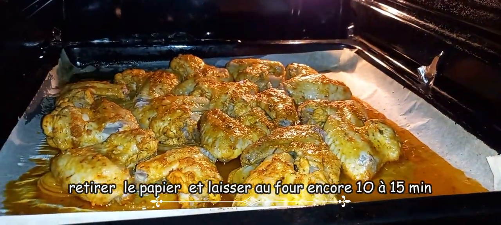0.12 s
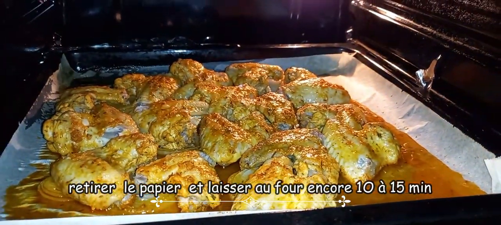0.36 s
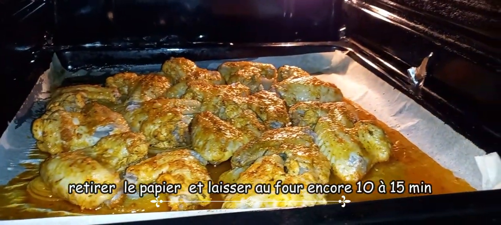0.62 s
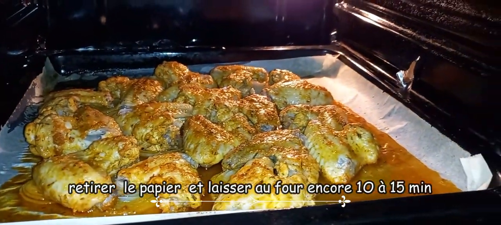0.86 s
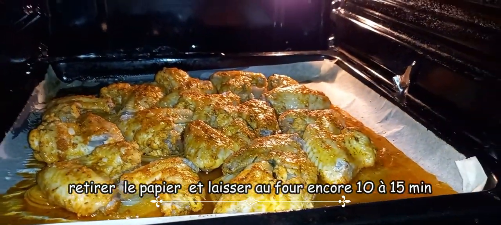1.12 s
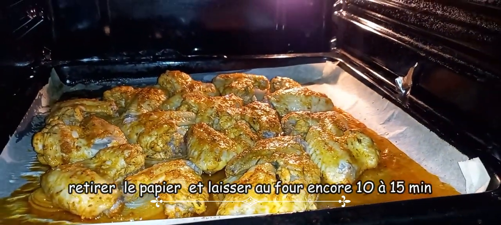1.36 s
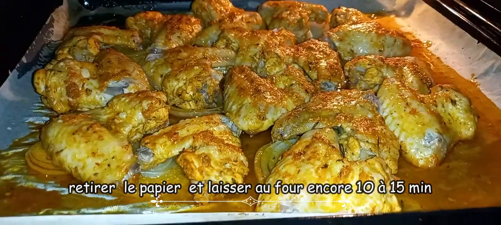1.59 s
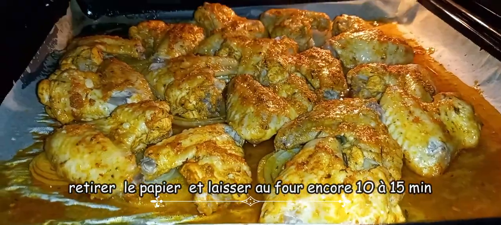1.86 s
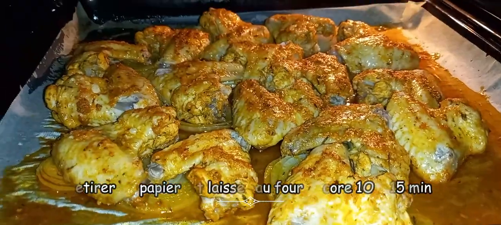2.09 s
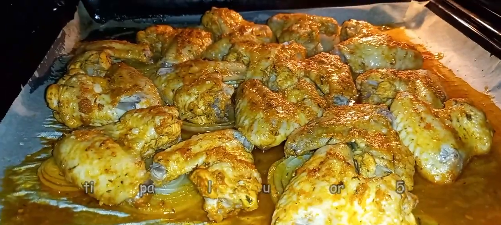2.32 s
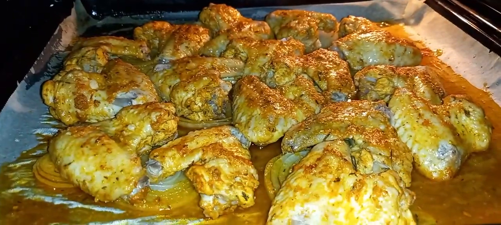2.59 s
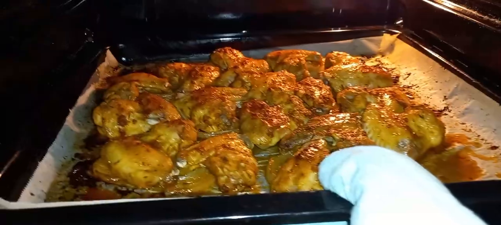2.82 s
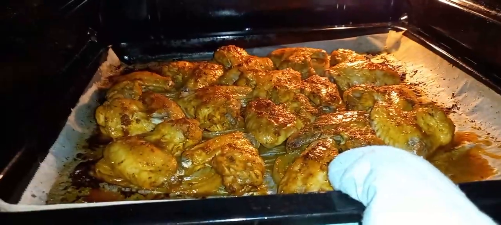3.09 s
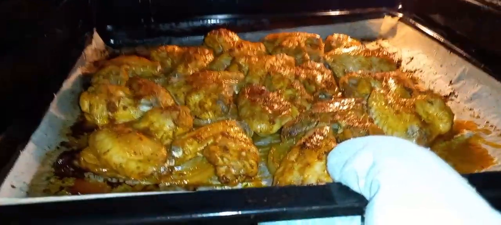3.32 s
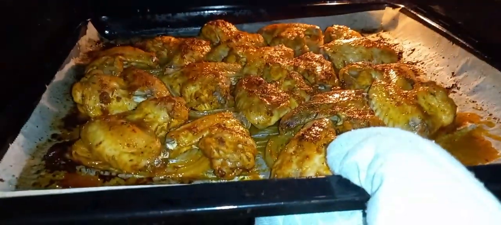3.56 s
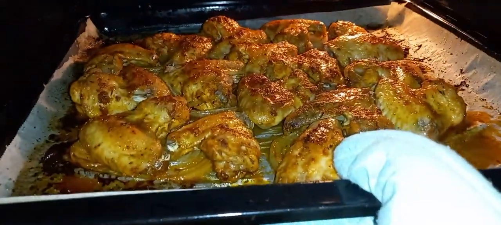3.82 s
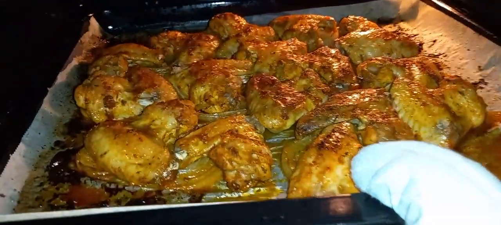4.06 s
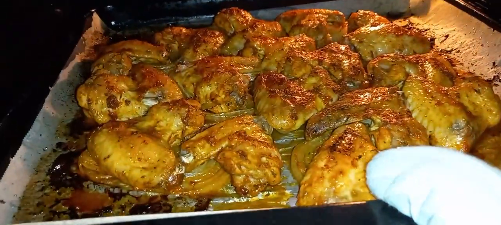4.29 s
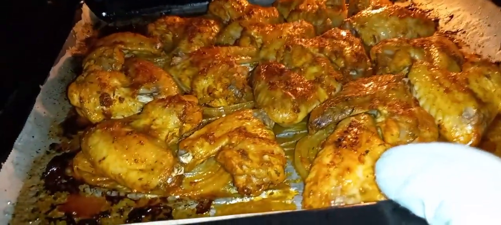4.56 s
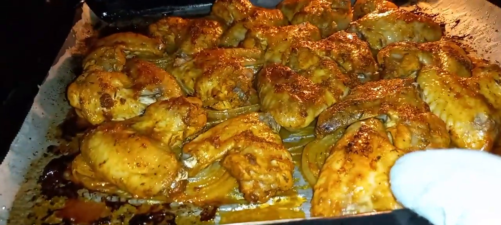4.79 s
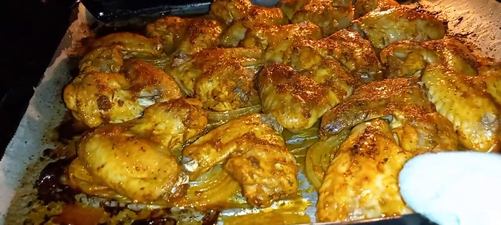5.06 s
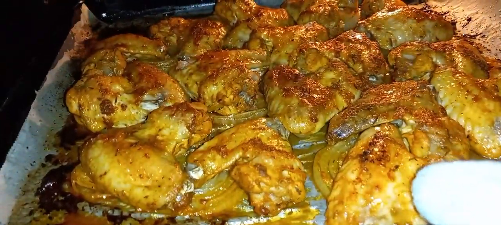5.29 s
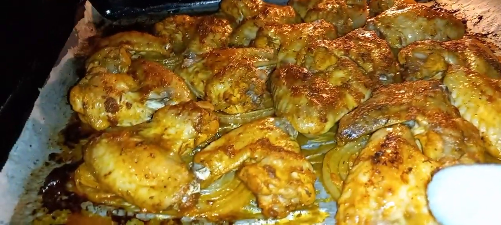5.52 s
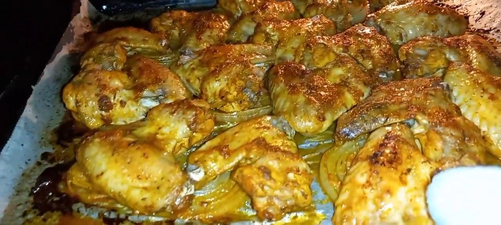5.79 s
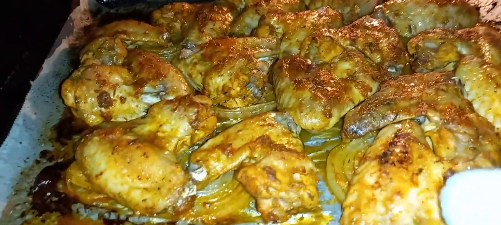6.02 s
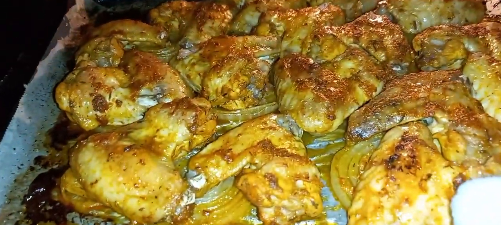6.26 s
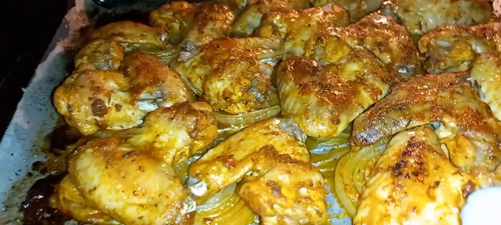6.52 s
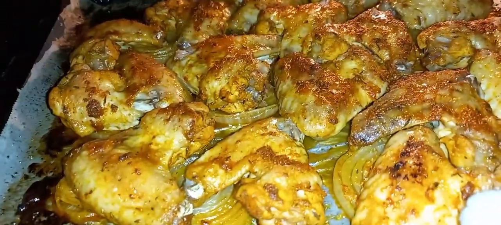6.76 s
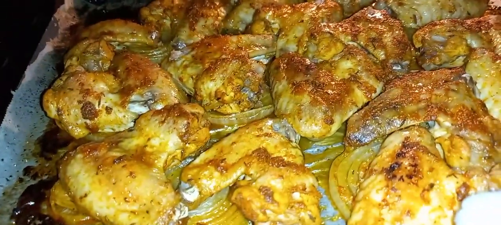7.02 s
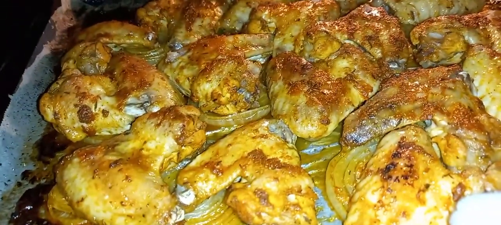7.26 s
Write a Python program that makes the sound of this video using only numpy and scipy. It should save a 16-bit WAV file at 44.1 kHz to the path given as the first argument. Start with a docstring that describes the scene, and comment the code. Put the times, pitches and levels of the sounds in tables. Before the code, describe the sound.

Bright, dry paper crackle opens over a steady low electric hum in a kitchen oven. The paper fades, leaving sparse high ticks of spitting fat. Hard cuts change the airy drone; after a very brief gap comes a heavy hollow tray thump, then a clattering cluster. Small fat pops grow busier, with soft tray bumps and a paper tick at the close, picked up nearby by a phone.

```python
"""Baking paper is pulled away with crinkles and snaps, over the hum and blowing of an open oven, near a phone.
Fat spits on roasting meat; after a short silence the steel tray slides and knocks on its rails, and again near
the end. Three stretches join by hard cuts. Paper, fat and air are shaped noise; the motor is wavering sines;
each knock is a decaying thud, a bank of panel modes and a noise rattle."""
import sys
import numpy as np
from scipy import signal
from scipy.fft import rfft, irfft, next_fast_len
from scipy.io import wavfile
from scipy.ndimage import uniform_filter1d

SR = 44100
rng = np.random.default_rng(int(sys.argv[2]) if len(sys.argv) > 2 else 0)


def generate_wav(signal):
    """Clip the signal to [-1, 1] and save it as 16-bit WAV at the path in sys.argv[1]."""
    frames = np.transpose(np.atleast_2d(signal))
    scaled = np.clip(frames, -1, 1) * 32767
    pcm = np.round(scaled).astype(np.int16)
    wavfile.write(sys.argv[1], SR, pcm)


def ratio_of_db(decibels):
    """Turn decibels (scalar or array-like) into linear amplitude factors; 0 dB maps to 1."""
    return 10 ** (np.asarray(decibels, float) / 20)


N = 325440
TIME_S = np.arange(N) / SR


def curve(table, column):
    """One column of a table, joined by straight lines in time."""
    rows = np.array(table)
    return np.interp(TIME_S, rows[:, 0], rows[:, column])


def at_hz(table, hz):
    """A spectrum table read on a log-frequency axis."""
    rows = np.array(table)
    return np.interp(np.log(hz + 1), np.log(rows[:, 0]), rows[:, 1])


def pan(left_minus_right_db):
    """Left and right gains for a level difference."""
    return ratio_of_db(np.array([[left_minus_right_db], [-left_minus_right_db]]) / 2)


# left-right likeness of noise: freq_hz, likeness_0_to_1
LIKENESS = [(60, 0.3), (130, 0.93), (290, 0.82), (640, 0.5), (1410, 0), (3100, 0.03), (6820, 0),
            (15000, 0.02)]
# stereo balance of noise: freq_hz, left_minus_right_db
NOISE_BALANCE = [(60, -7), (110, -1.5), (200, -2), (380, 4.5), (700, -2), (1290, -1.5), (2380, 3),
                 (4400, -0.5), (8120, 0), (15000, 2.5)]


def noise(colour, bumps=(), size=N):
    """Stereo noise, mono rms 1, with resonant bumps (freq_hz, width_hz, gain_db); likeness varies with frequency."""
    padded = next_fast_len(size)
    hz = np.fft.rfftfreq(padded, 1 / SR)
    db = at_hz(colour, hz)
    for centre_hz, width_hz, gain_db in bumps:
        db = db + gain_db / (1 + (2 * (hz - centre_hz) / width_hz) ** 2)
    likeness = np.clip(at_hz(LIKENESS, hz), 0, 1)
    mid, side = rfft(rng.standard_normal((2, padded)))
    mid = mid * np.sqrt(1 + likeness)
    side = side * np.sqrt(1 - likeness)
    half_balance_db = at_hz(NOISE_BALANCE, hz) / 2
    left = (mid + side) * ratio_of_db(db + half_balance_db)
    right = (mid - side) * ratio_of_db(db - half_balance_db)
    stereo = irfft(np.array([left, right]), padded)[:, :size]
    return stereo / np.sqrt(np.mean(stereo.mean(axis=0) ** 2))


def walk(rate_hz):
    """Random levels held for 1 / rate_hz and slewed twice; spread near 1."""
    hold = int(SR / rate_hz)
    steps = np.repeat(rng.standard_normal(N // hold + 1), hold)
    return 1.2802 * uniform_filter1d(uniform_filter1d(steps, hold), hold)[:N]


def fade(t_s, t60_s, rise_s):
    """Quick rise, exponential decay."""
    return (1 - np.exp(-t_s / rise_s)) * 1000. ** (-t_s / t60_s)


def add(out, start_s, sound):
    """Mix a short sound in at start_s."""
    i = int(start_s * SR)
    out[:, i:i + sound.shape[-1]] += sound[..., :N - i]


def band(centre_hz, step_octaves):
    """A rounded hump as a spectrum table."""
    return [(centre_hz * 2. ** (k * step_octaves), -6. * k * k) for k in range(-3, 4)]


# tray knocks: start_s, thud_db, thud_hz, contact_s, ring_db, rattle_db
TRAY_KNOCKS = [(2.8275, -4.5, 225, 0.0058, -15.5, -30.5), (2.858, -18.5, 257, 0.0074, -31, -40.5),
               (2.904, -32.5, 227.6, .016, -36, -64), (3.4095, -10, 171.1, 0.0042, -25, -22),
               (3.4407, -11, 214, 0.00374, -27, -38), (3.4497, -14, 200, 0.0053, -31, -58),
               (3.4804, -17, 171, 0.0073, -35.5, -54), (3.507, -16.5, 200, 0.004, -35, -49.5),
               (3.578, -28, 150, 0.0064, -45.5, -55), (7.2099, -25.5, 165, 0.011, -48.5, -69.5),
               (7.2727, -33, 195, 0.0098, -35.5, -36.5), (7.297, -36, 200, .0054, -40, -62),
               (7.327, -37, 223, 0.0056, -45.5, -51)]
# tray panel modes: freq_hz, level_db, t60_s
TRAY_MODES = [(160.3, -10, 0.36), (200, -5, 0.227), (250.3, -3, 0.29), (381, -7, 0.19), (452, -11, 0.14),
              (622, -16, 0.22), (683.5, -15, 0.18), (921, -23, 0.13), (1138, -16, 0.12),
              (1310, -25.5, 0.13), (1487, -25, 0.1), (1704, -18.5, 0.043)]
# rattle spectrum: freq_hz, level_db
RATTLE_COLOUR = [(300, 3), (1000, -1), (1600, 0.5), (2200, -5.5), (3200, -2), (4000, -4), (6000, -11.5),
                 (10000, -16), (15700, -29), (16200, -44.5)]
# overtone level is relative to the panel ring
OVERTONE_RATIO, OVERTONE_DB, OVERTONE_PAN_DB, TRAY_PAN_DB = 2.2, 0, 2.5, 1.4


def tray():
    """Each knock is a low thud of a few cycles, the loose panel's modes and a rattle whose treble dies first."""
    out = np.zeros((2, N))
    t = np.arange(16000) / SR
    # three detuned copies of every mode, so the ring beats
    hz, mode_db, t60_s = np.tile(np.array(TRAY_MODES).T, 3)[:, :, None]
    for start_s, thud_db, thud_hz, contact_s, ring_db, rattle_db in TRAY_KNOCKS:
        overtone = ratio_of_db(ring_db + OVERTONE_DB) * np.sin(2 * np.pi * OVERTONE_RATIO * thud_hz * t)
        overtone = overtone * pan(OVERTONE_PAN_DB)
        swell = (t / contact_s * np.exp(1 - t / contact_s)) ** 2
        thud = swell * (ratio_of_db(thud_db) * np.sin(2 * np.pi * thud_hz * t) + overtone)

        chance = rng.standard_normal((4, len(hz), 1))
        phase = 2 * np.pi * hz * (1 + 0.021 * chance[0]) * t + 3 * chance[1]
        # higher modes are less in step between left and right
        phase = phase + np.clip(hz / 550, 0, 2) * chance[2:]
        ring = (ratio_of_db(mode_db + ring_db) * fade(t, t60_s, 0.0029) * np.sin(phase)).sum(axis=1)

        crack = noise(RATTLE_COLOUR, size=len(t)) * fade(t, 0.064, 0.00047)
        tail = noise(RATTLE_COLOUR, [(700, 4880, 15.7)], size=len(t)) * fade(t, 0.33, 0.0038) * ratio_of_db(-7.5)
        rattle = ratio_of_db(rattle_db) * (crack + tail)
        add(out, start_s, (thud + ring + rattle) * pan(TRAY_PAN_DB))
    return out


# paper spectrum: freq_hz, level_db
PAPER_COLOUR = [(180, -39), (300, -8), (433, -10.5), (546, -7.5), (856, -6.5), (1970, -1.5), (4230, -1),
                (6100, -3.5), (7950, 0.5), (10000, -2.5), (15600, -3), (16100, -40)]
# dragged or shifting paper, and at 2.797 s the tray sliding on its rails: start_s, level_db, length_s,
# extra_treble_db
PAPER_STROKES = [(-.03, -36, .13, 1.5), (0.095, -36, 0.26, -0.5), (.335, -39, 0.17, 0.5),
                 (0.572, -52, 0.088, 0), (0.648, -45, 0.017, -8), (0.764, -49.5, 0.013, 0),
                 (2.797, -44, 0.019, -12), (3.954, -63, 0.094, -11), (4.093, -62.5, 0.24, -8),
                 (4.517, -63, 0.05, -7.5)]
# paper snaps: start_s, level_db, centre_hz, tail_t60_s, left_minus_right_db
PAPER_SNAPS = [(0.0602, -30.5, 7800, 0.25, -5), (0.1148, -31.5, 2660, 0.072, -8),
               (0.1588, -33, 8230, 0.091, 0), (.265, -39.5, 8130, .08, -4), (0.347, -31.5, 4270, 0.084, -9),
               (0.4004, -39.5, 4170, .09, -5), (.514, -41, 7840, 0.096, -10),
               (0.659, -32.5, 8800, 0.043, 3), (.7662, -46.5, 2066, 0.18, -5),
               (0.8454, -52, 7600, 0.12, -1), (3.1374, -53, 11400, 0.22, -2),
               (3.228, -53.5, 7720, 0.167, -0.8), (6.8384, -50, 2930, 0.19, -1),
               (7.2747, -41.5, 1780, .088, 2), (7.329, -56, 2010, 0.073, 5)]
BITE_S, SAG_DB_PER_S, RELEASE_DB_PER_S = 0.0025, 22.5, 167
SNAP_TAIL_DB = -6


def paper():
    """Dense crinkles of dragged paper, patchy from band to band, and single snaps that ring on in the oven."""
    rustle = noise(PAPER_COLOUR, [(1930, 150, 3.6)])
    lows = [0]
    for edge_hz in (1200, 2400, 4000, 6000):
        lows.append(signal.sosfiltfilt(signal.butter(4, edge_hz, fs=SR, output="sos"), rustle))
    lows.append(rustle)
    crinkle_db = 0.8 * walk(300)  # shared by all bands
    bands = []
    for below, above in zip(lows, lows[1:]):
        patchy_db = crinkle_db + 1.5 * walk(30.03) + 1.2 * walk(120)
        bands.append((above - below) * ratio_of_db(patchy_db))

    # a stroke bites at once, sags while it lasts and dies away in the oven
    body, treble = np.zeros((2, N))
    for start_s, level_db, length_s, treble_db in PAPER_STROKES:
        t = np.maximum(TIME_S - start_s, 0)
        sag_db = SAG_DB_PER_S * np.minimum(t, length_s)
        release_db = RELEASE_DB_PER_S * np.maximum(t - length_s, 0)
        shape = (1 - np.exp(-t / BITE_S)) * ratio_of_db(level_db - sag_db - release_db)
        body = np.hypot(body, shape)
        treble = np.hypot(treble, shape * ratio_of_db(treble_db))
    out = (body * sum(bands[:-1]) + treble * bands[-1]) * pan(-2.9)

    t = np.arange(9000) / SR
    for start_s, level_db, centre_hz, t60_s, pan_db in PAPER_SNAPS:
        crack_shape = fade(t, 0.01415, 0.00065) + 0.16 * fade(t, 2.9 * t60_s, 0.0012)
        crack = noise(band(centre_hz, 0.14), size=len(t)) * crack_shape
        tail = noise(PAPER_COLOUR, size=len(t)) * fade(t, t60_s, 0.0007) * ratio_of_db(SNAP_TAIL_DB)
        add(out, start_s, (crack + tail) * ratio_of_db(level_db) * pan(pan_db))
    return out


# frying level: time_s, level_db
FRY_LEVEL = [(0.9, -62.5), (1.55, -68.5), (1.86, -65), (3.05, -68.5), (4.0, -64.5), (4.3, -63.5),
             (5.8, -65.5), (6.6, -62.5), (7.1, -65), (7.38, -59)]
# frying spectrum: freq_hz, level_db
FRY_SPECTRUM = [(2060, -11), (3500, -10), (4290, -12), (5460, -8), (5900, -11), (7950, -0.5), (10500, -7),
                (15100, -9.5), (16000, -21)]
# loud spits of fat: start_s, peak_db, centre_hz, left_minus_right_db
LOUD_SPITS = [(1.3174, -54, 8600, 1.5), (1.3882, -55, 9180, 2.5), (1.4521, -60, 12800, 7),
              (1.4885, -53.5, 8680, 4), (1.6016, -48, 8000, 0), (1.6586, -49.5, 12800, 2.5),
              (1.7887, -48, 11700, 4), (1.9928, -52, 8100, -1.5), (2.171, -54, 7500, -2.5),
              (2.2757, -53.5, 7400, -2.5), (2.4074, -47.5, 8050, -2), (2.4261, -48, 8970, 1.0),
              (2.7352, -55, 6380, -3.5), (3.5748, -52.5, 10800, 2.5), (4.4443, -48, 7900, 2),
              (4.4934, -49.5, 8750, 1.0), (4.5989, -50.5, 8000, 0.5), (4.749, -49, 8260, -2),
              (4.9152, -49, 8740, 1.5), (4.9551, -48.5, 12800, 6), (5.7708, -52.5, 7730, 0.0),
              (5.8835, -51, 13000, 2.5), (5.9434, -53, 11500, 1.0), (5.9574, -48, 7810, 3.5),
              (6.1325, -50.5, 8030, 1.0), (6.2203, -51, 7860, 1.0), (6.2679, -51, 8040, -1.5),
              (6.329, -49, 12900, 2.5), (6.4078, -52, 12500, 5), (6.445, -46.5, 11740, 1.5),
              (6.5665, -46.5, 12200, 1.0), (6.6628, -50, 8000, 1.0), (6.7342, -51.5, 8870, 0.5),
              (6.7575, -50, 8110, 1.5), (6.8374, -54, 9140, -5), (6.8885, -47, 7990, -1.0),
              (7.1051, -52, 7840, 0.5), (7.1332, -50, 8870, 6), (7.21, -53, 7600, 3),
              (7.2304, -49, 6720, 4)]
# lesser spits, at random times; peak relative to the frying level
SPITS_PER_S, SPIT_OVER_DB, SPIT_SCATTER_DB, SPIT_LOWEST_HZ = 7, 11.5, 2, 8000


def frying():
    """A hiss of countless tiny bubbles; small spits flare in one part of the treble, larger ones pop over them."""
    t = np.arange(1600) / SR
    out = np.zeros((2, N))
    fry_db = curve(FRY_LEVEL, 1)
    for flare_hz in (5200, 8000, 12000):
        chance = rng.random((int(45 * N / SR), 2))  # 45 flares per second
        kicks = np.zeros(N)
        kicks[(chance[:, 0] * N).astype(int)] = ratio_of_db(-3.5 * np.log(chance[:, 1] + 1e-9))
        flicker = signal.fftconvolve(kicks, fade(t, 0.032, 0.00021))[:N]
        out += noise(FRY_SPECTRUM, [(flare_hz, 0.5 * flare_hz, 14)]) * flicker * ratio_of_db(-10.5)
    out = (out + 0.52 * noise(FRY_SPECTRUM)) * ratio_of_db(fry_db)

    lesser = []
    for start_s in rng.random(SPITS_PER_S * N // SR) * TIME_S[-1]:
        level, pitch, side = rng.standard_normal(3)
        peak_db = fry_db[int(start_s * SR)] + SPIT_OVER_DB + SPIT_SCATTER_DB * level
        lesser.append((start_s, peak_db, SPIT_LOWEST_HZ * 2 ** (0.26 * abs(pitch)), 2.6 * side))
    for start_s, peak_db, centre_hz, pan_db in list(LOUD_SPITS) + lesser:
        burst = noise(band(centre_hz, 0.2), size=len(t)) * fade(t, 0.0169, 0.00037)
        sizzle = noise(FRY_SPECTRUM, size=len(t)) * fade(t, 0.064, 0.00029) * ratio_of_db(-7.5)
        spit = burst + sizzle
        spit = spit / abs(spit.mean(axis=0)).max()
        add(out, start_s, spit * ratio_of_db(peak_db) * pan(pan_db))
    return out


# stretches: start_s, end_s
STRETCH_TIMES = [(0, 1.5958), (1.5958, 2.764), (2.7955, 7.4)]
# motor, per stretch: blade_hz, left_minus_right_db
MOTOR_TONES = [(242, -2), (243, -6), (255, 0.5)]
# fan levels, one list per stretch: time_s, hum_db, air_db; both swell briefly near 2.8 s as the tray slides and
# knocks
FAN_LEVELS = [
    [(0, -45.5, -49), (.8, -45, -48.5), (1.59, -46.5, -52)],
    [(1.6, -43.5, -46), (2.76, -43.5, -44.5)],
    [(2.8, -39, -32.5), (3.0, -44, -48.5), (3.9, -43.5, -46), (4.2, -40.5, -44), (5.8, -38, -45.5),
     (7.38, -40.5, -43.5)],
]
# blown-air spectrum, one list per stretch: freq_hz, level_db
AIR_COLOURS = [
    [(15, -53), (25, -31), (73, -11.5), (104, -5.5), (176, -17), (248, -14), (439, -33.5), (565, -31),
     (936, -37.5), (1350, -36), (2100, -46), (6000, -75), (7800, -82)],
    [(15, -67), (25, -35), (75, -9), (140, -8.5), (248, -14), (383, -24.5), (874, -33), (1050, -30),
     (1350, -35.5), (2040, -46), (6000, -62.5), (7800, -89)],
    [(15, -57), (25, -23), (49, -19.5), (75, -5), (153, -11.5), (259, -14), (439, -27), (936, -35.5),
     (1250, -33), (1520, -40), (3000, -48), (6000, -58), (7800, -80)],
]
# oven cavity resonances in the air noise: freq_hz, width_hz, gain_db
CAVITY_MODES = [(150, 17, 6), (375, 34, 1), (790, 34, 6.5), (898.6, 42, -6.5), (1132, 104, 10.5),
                (1452, 50, 5), (1780, 120, 0.5), (1877, 53, 8.5), (2846, 210, 7), (3750, 150, 1.5)]
# octave and blade levels are relative to the hum
HUM_HZ, OCTAVE_DB, BLADE_DB, CLICK_DB = 100, -17.5, -14, -32


def fan():
    """Mains hum with its octave, a wavering blade tone and air noise; every cut restarts them abruptly."""
    out = np.zeros((2, N))
    stretches = zip(STRETCH_TIMES, MOTOR_TONES, FAN_LEVELS, AIR_COLOURS)
    for (start_s, end_s), (blade_hz, pan_db), levels, colour in stretches:
        phase = 2 * np.pi * (HUM_HZ * TIME_S + rng.random())
        octave = ratio_of_db(OCTAVE_DB + 4.1 * walk(8.9)) * np.sin(2 * phase + 1.7)
        hum = np.sin(phase) + octave
        blade_phase = 2 * np.pi * np.cumsum(blade_hz + 1.502 * walk(5)) / SR
        blade = ratio_of_db(BLADE_DB + 1.7 * walk(12)) * np.sin(blade_phase)
        hum_rms = ratio_of_db(curve(levels, 1) + 1.36 * walk(7))
        tones = np.sqrt(2) * hum_rms * (hum + blade) * pan(pan_db)
        air = noise(colour, CAVITY_MODES) * ratio_of_db(curve(levels, 2) + 0.92 * walk(9))
        out += (tones + air) * ((TIME_S >= start_s) & (TIME_S < end_s))
    # the first cut lands mid-wave: a decaying step that clicks
    click = ratio_of_db(CLICK_DB) * 1000. ** (-TIME_S[:900] / 0.013)
    add(out, STRETCH_TIMES[1][0], click)
    return out


def scene():
    """All sources together, silent between the second and third stretch."""
    heard = (TIME_S < STRETCH_TIMES[1][1]) | (TIME_S >= STRETCH_TIMES[2][0])
    return (tray() + paper() + frying() + fan()) * heard


def low_pass(x):
    """Removes everything above the highest recorded frequency."""
    return signal.sosfilt(signal.butter(12, 17030, fs=SR, output="sos"), x)


def record(dry):
    """The phone's microphone drops the deepest bass, below 45 Hz."""
    bass_cut = signal.butter(2, 45, "high", fs=SR, output="sos")
    mix = signal.sosfilt(bass_cut, dry)
    return low_pass(mix)


dry = scene()
out = record(dry)
generate_wav(out)
```